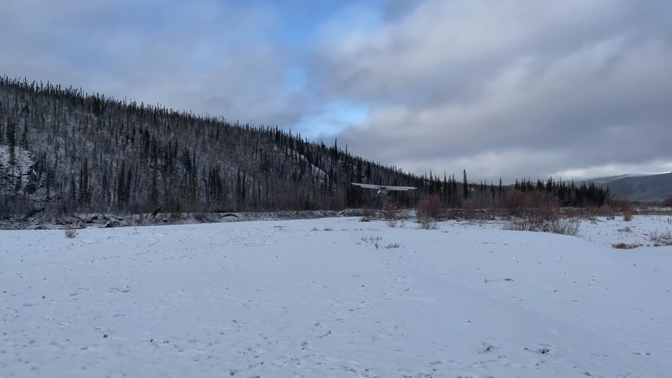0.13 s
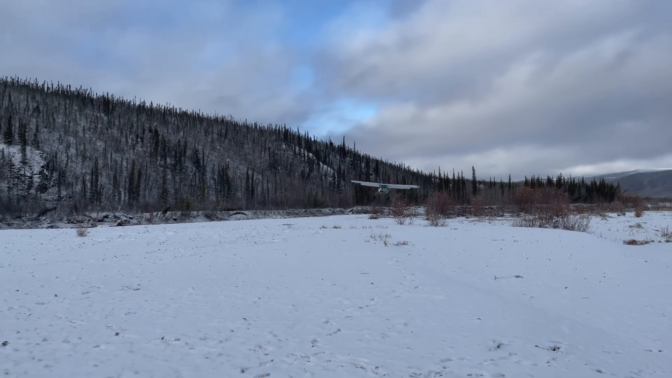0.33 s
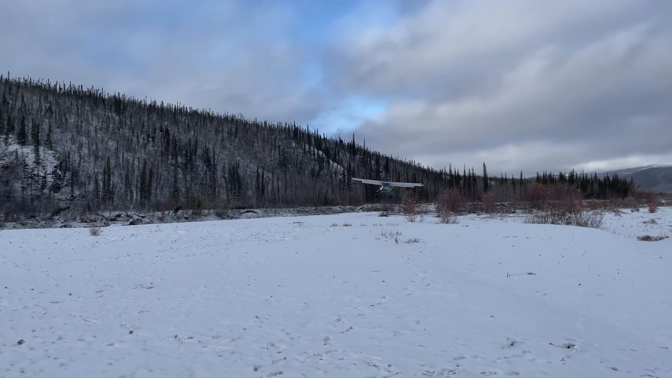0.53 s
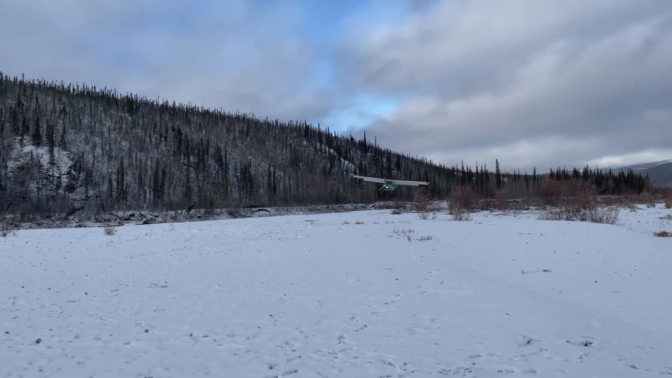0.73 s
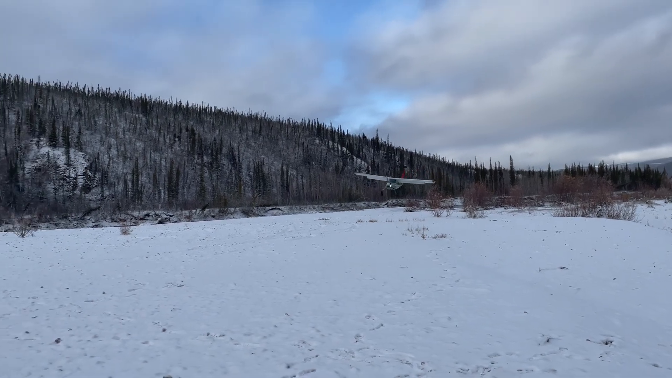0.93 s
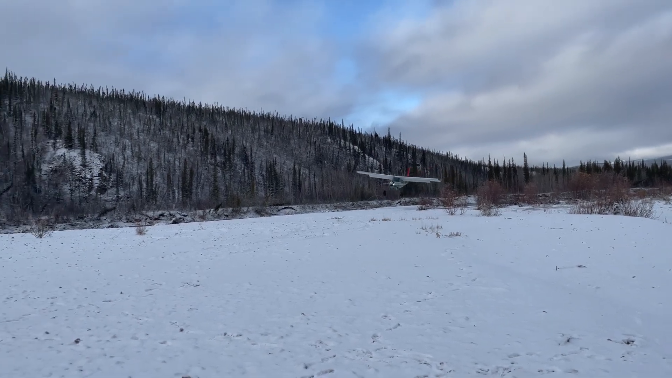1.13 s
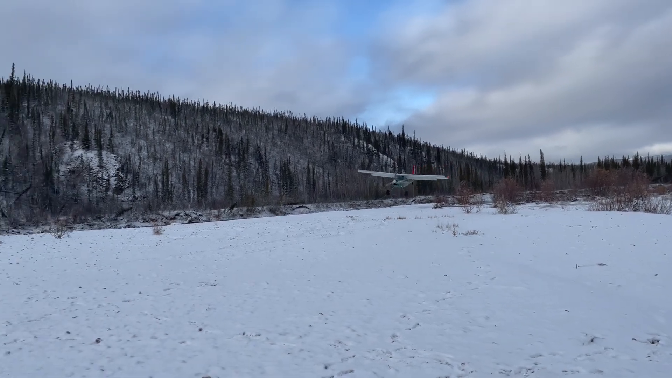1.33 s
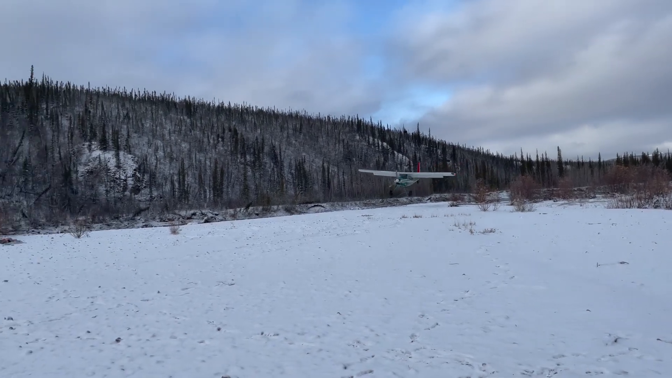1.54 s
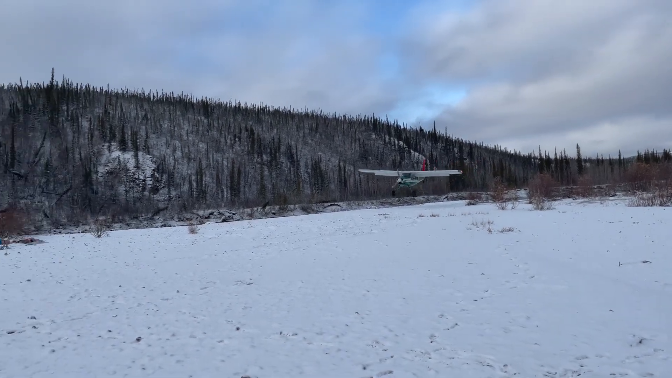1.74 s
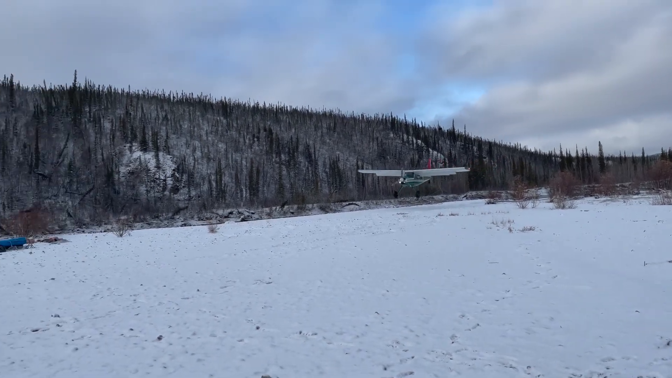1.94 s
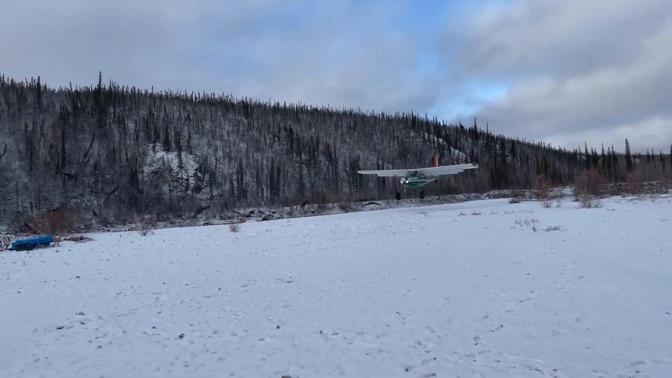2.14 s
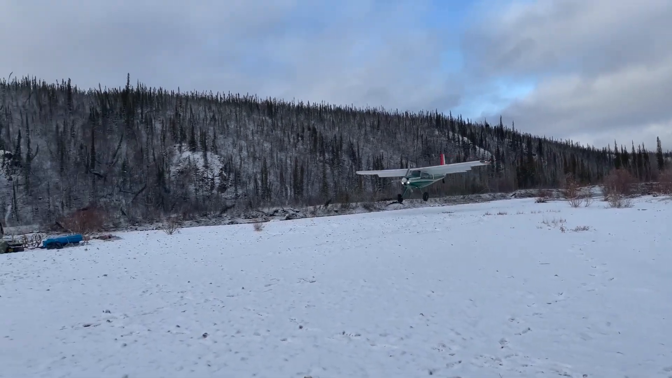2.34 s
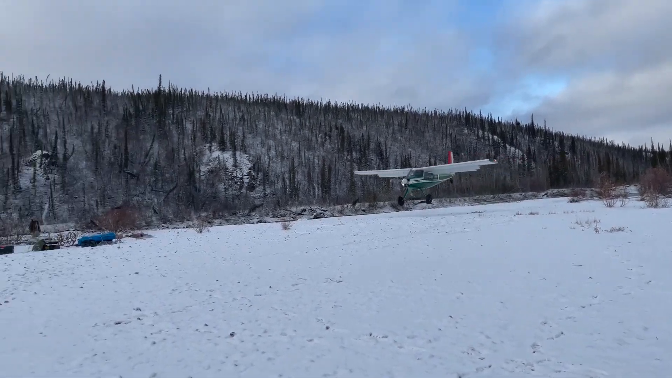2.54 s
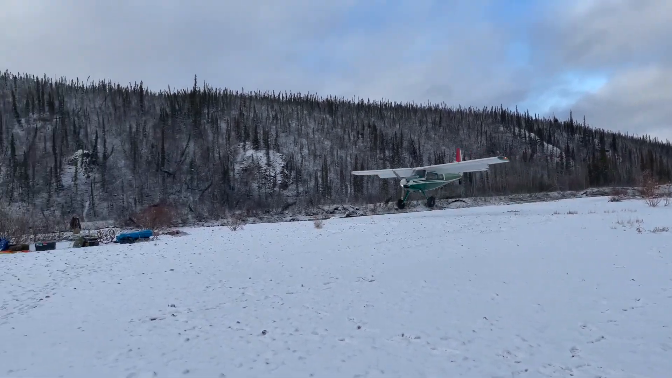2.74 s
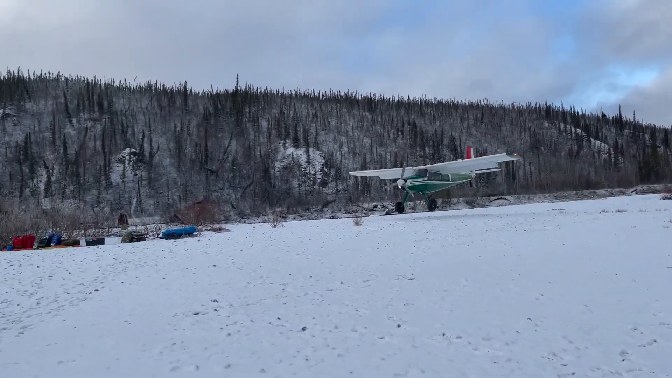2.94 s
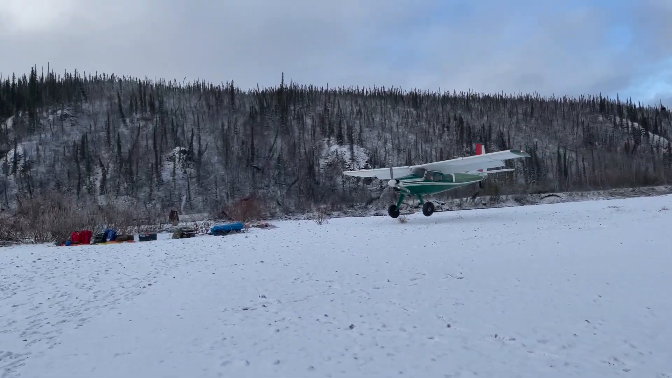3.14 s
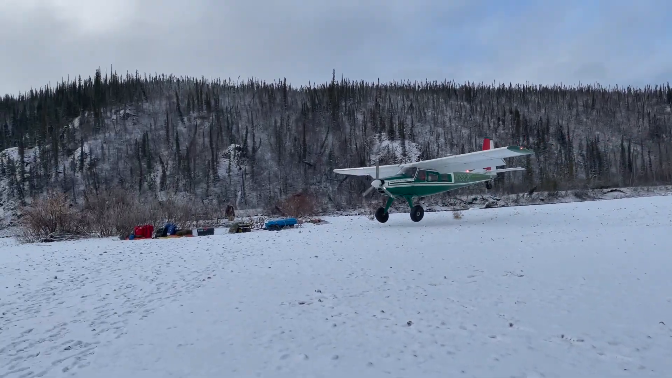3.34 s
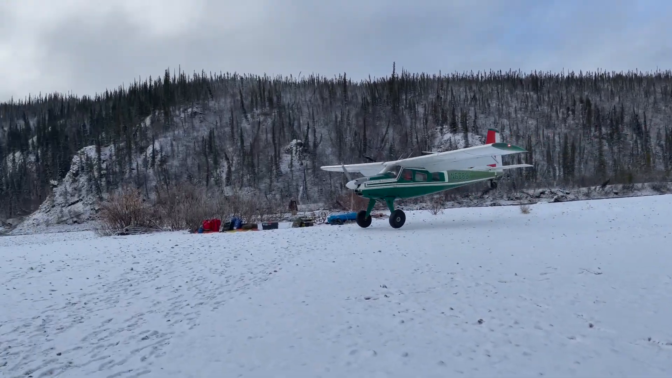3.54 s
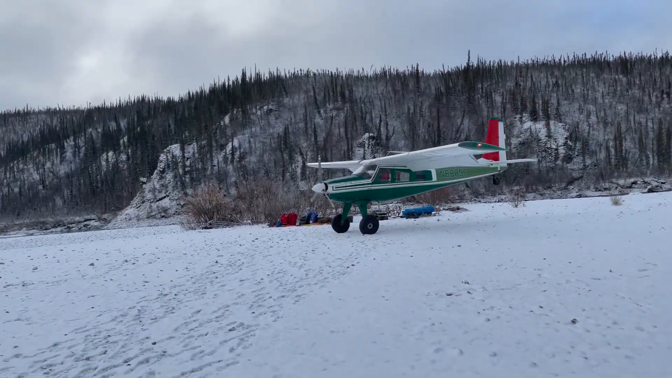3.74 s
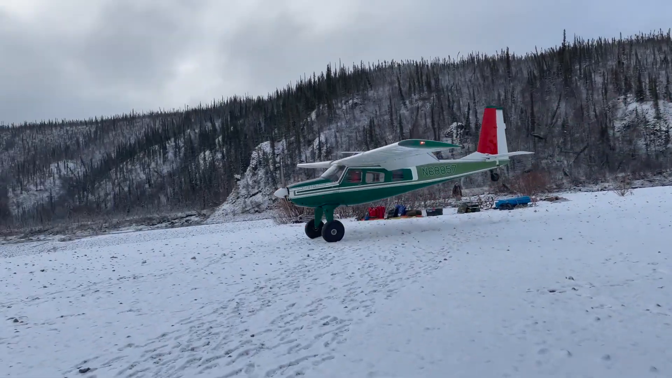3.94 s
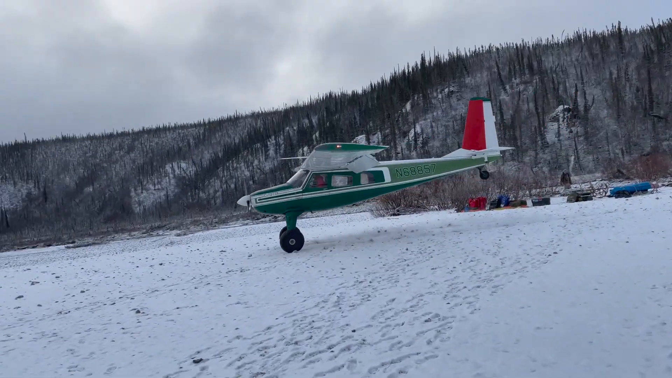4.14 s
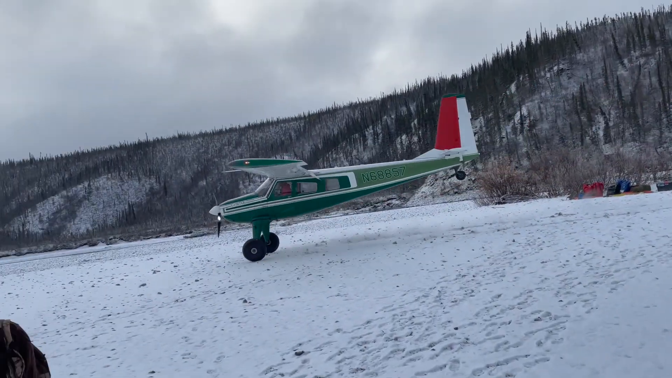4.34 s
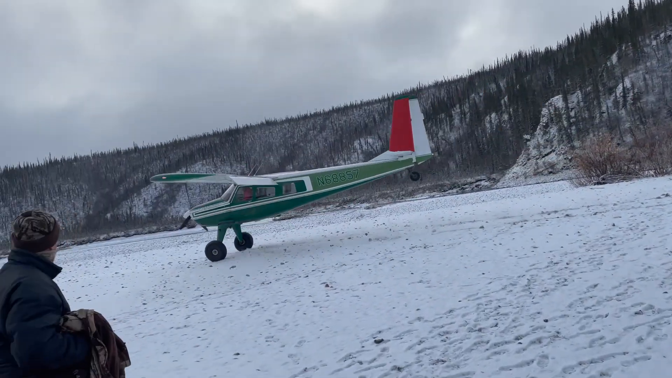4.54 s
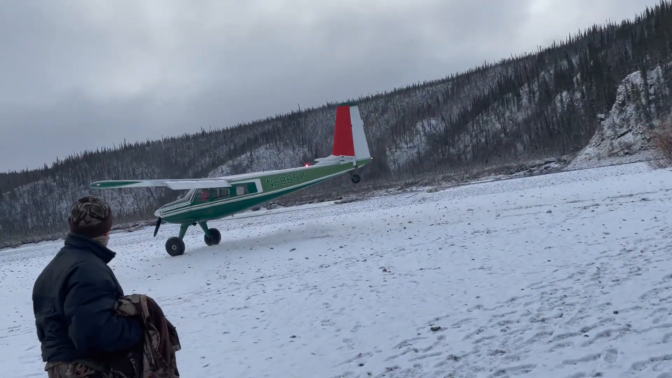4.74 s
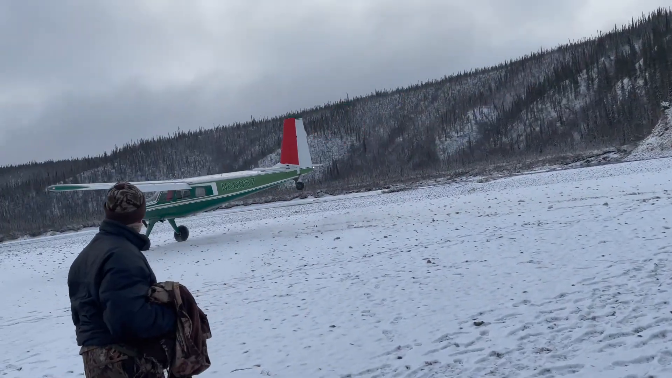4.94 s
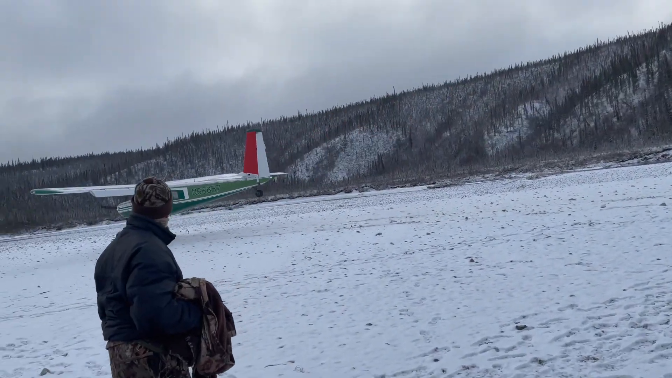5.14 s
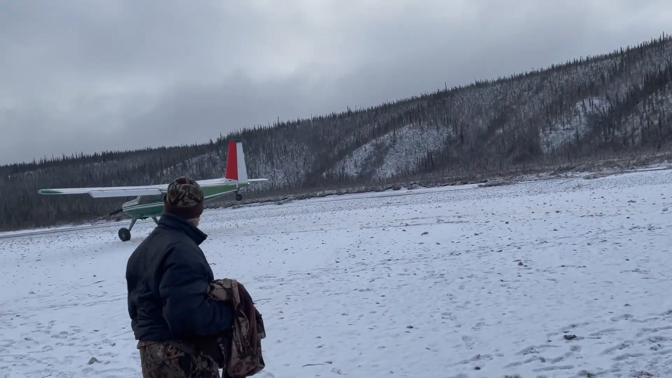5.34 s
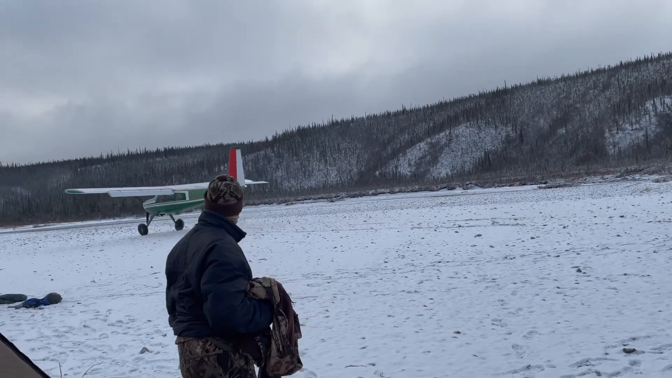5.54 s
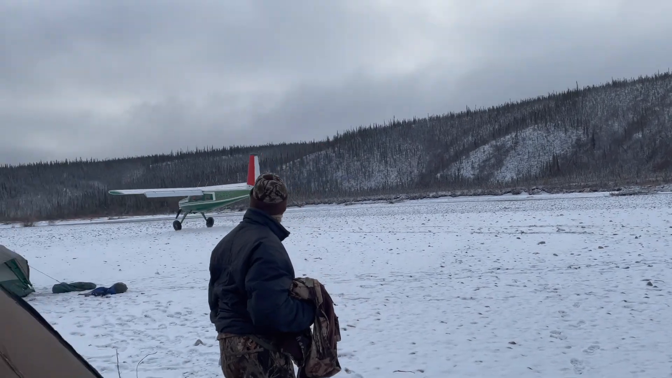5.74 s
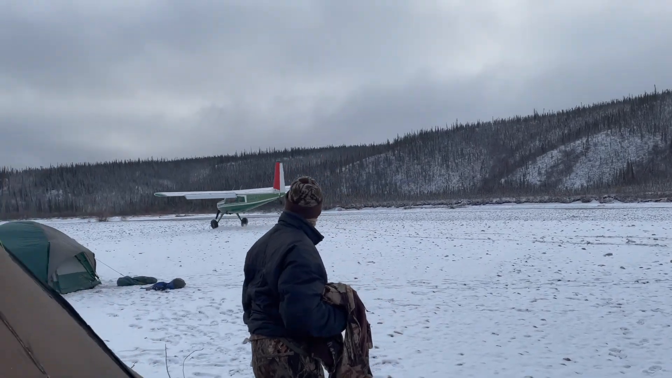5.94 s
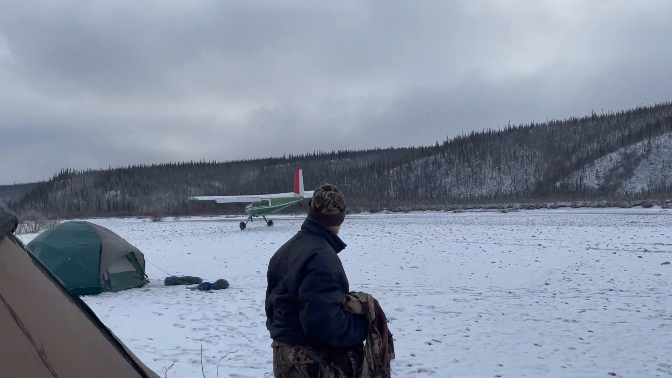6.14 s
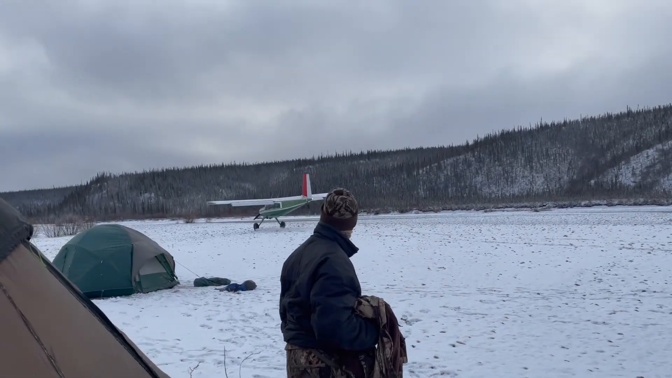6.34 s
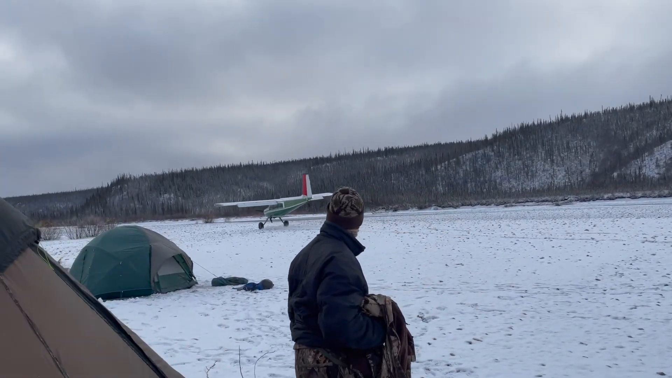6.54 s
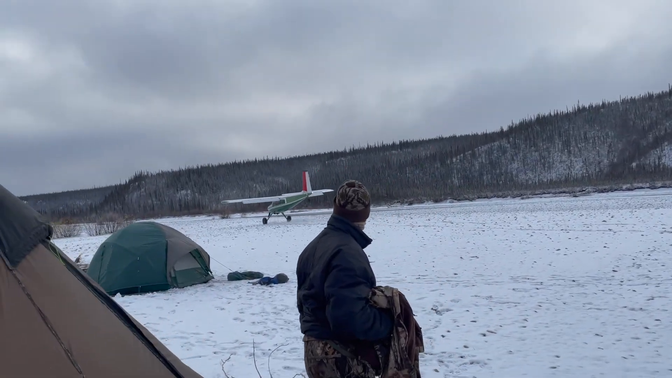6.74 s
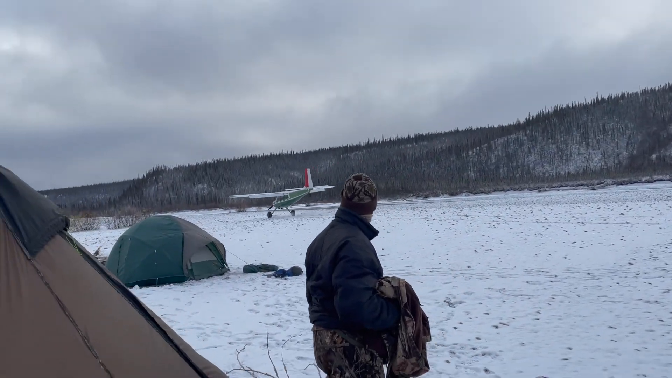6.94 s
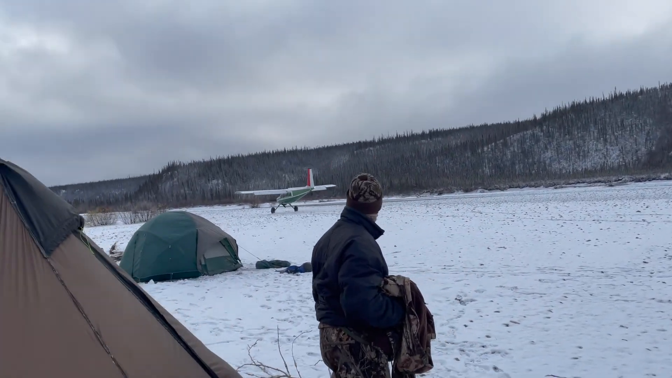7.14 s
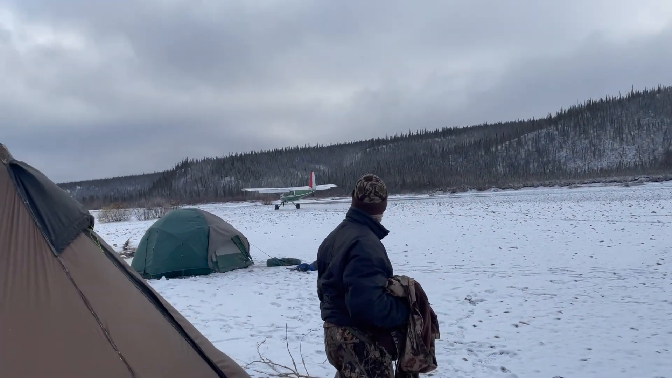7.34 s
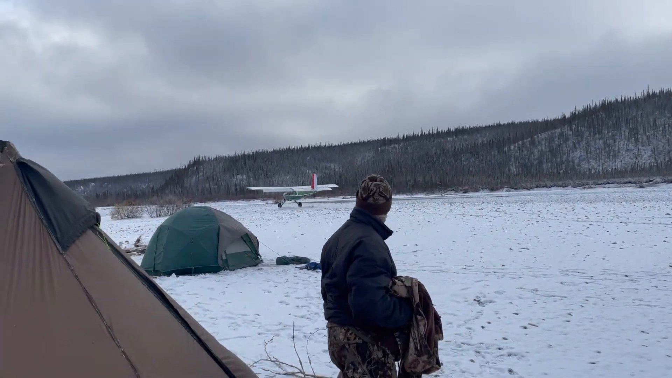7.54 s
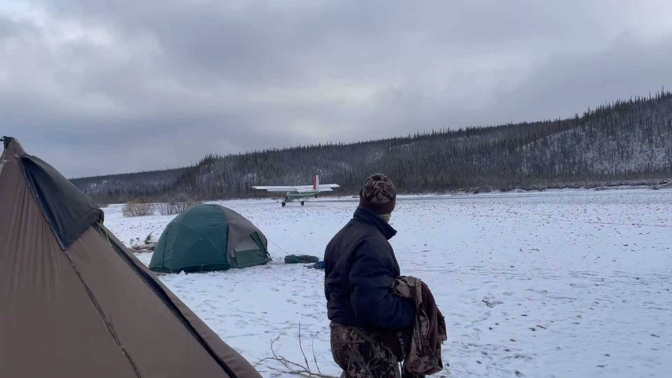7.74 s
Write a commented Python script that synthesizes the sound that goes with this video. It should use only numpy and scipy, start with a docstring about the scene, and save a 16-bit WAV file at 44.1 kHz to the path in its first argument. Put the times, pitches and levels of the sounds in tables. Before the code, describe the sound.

A piston engine and propeller swell from a thin, distant buzz to a full, throbbing roar, heard on a hand-held microphone in the open. As the plane lands past the listener the drone drops steeply, hiss and low boom surge, then everything falls away. Slow chuffing and faint propeller swishes remain. Near the end, dull handling bumps, dry cracks and light wind sit over the quiet engine.

```python
"""Light plane passing low

A geared six-cylinder engine with a three-blade propeller comes in, throttles back as it passes and recedes.
One falling firing rate drives sine orders, exhaust pulses, and the throb, chuffs and swishes of the air noise.
Wind noise, short cracks and dull bumps lie on top; a hand-held microphone hears it through two ports."""
import sys
import numpy as np
from scipy import signal
from scipy.fft import rfft, irfft, next_fast_len
from scipy.io import wavfile

SR = 44100
rng = np.random.default_rng(int(sys.argv[2]) if len(sys.argv) > 2 else 0)


def dump(signal):
    """Clip the signal to [-1, 1] and save it as 16-bit WAV at the path in sys.argv[1]."""
    limited = np.clip(np.atleast_2d(signal).T, -1, 1)
    pcm = np.round(limited * 32767).astype(np.int16)
    wavfile.write(sys.argv[1], SR, pcm)


N = 347489
HZ = np.fft.rfftfreq(next_fast_len(N), 1 / SR)
BLADES_PER_FIRING = 77 / 120
DRIFT_STEP_SAMPLES = 32


def amp(db):
    """Decibels to gain."""
    return 10 ** (np.asarray(db) / 20)


def left_right(db):
    """Gains of two ports, left over right by the given decibels."""
    return amp(np.array([[.5], [-.5]]) * db)


def in_time(rows):
    """Columns of a curve table at every sample."""
    s, *columns = np.transpose(rows)
    return [np.interp(np.arange(N) / SR, s, c) for c in columns]


def shaped(x, response):
    """Filter by a frequency response given on HZ."""
    size = next_fast_len(N)
    return irfft(rfft(x, size) * response, size)[..., :N]


def rms_one(x):
    """Scale to unit rms."""
    return x / np.sqrt(np.mean(x ** 2))


def drift(rate_hz, order=2, slowest_hz=0):
    """Random wander of spread 1, between a slowest speed and a rate."""
    size = next_fast_len(N // DRIFT_STEP_SAMPLES + 2)
    hz = np.fft.rfftfreq(size, DRIFT_STEP_SAMPLES / SR)
    highpass = hz / (hz + slowest_hz + 1e-9)
    lowpass = 1 / (1 + (hz / rate_hz) ** order)
    slow = irfft(rfft(rng.standard_normal(size)) * highpass * lowpass, size)
    return np.interp(np.arange(N) / DRIFT_STEP_SAMPLES, np.arange(size), rms_one(slow))


def noise_pair(response):
    """Two unrelated draws of filtered noise."""
    return rms_one(shaped(rng.standard_normal((2, N)), response))


# noise colour, lower and upper part: pitch_hz, density_db_per_hz
COLOUR = [(25, -31), (45, 7.5), (70, 22), (130, 20), (250, 16), (400, 6), (650, 2.5), (950, 1.5), (1200, 3),
          (1800, 2), (2800, 0), (3500, -3.5), (4600, -11.5), (7400, -21.5), (9500, -22.5)]
COLOUR_TOP = [(9500, -19), (11500, -24.5), (12800, -21), (13900, -30), (14500, -50), (15800, -62)]


def air(low_hz, high_hz):
    """Coloured noise between two crossovers."""
    hz, db = np.transpose(COLOUR + COLOUR_TOP[1:])
    band = 1 / np.sqrt((1 + (low_hz / (HZ + 1)) ** 8) * (1 + (HZ / high_hz) ** 8))
    colour_db = np.interp(np.log(HZ + 1), np.log(hz), db)
    return noise_pair(band * amp(colour_db))


def narrow(hz, half_width_hz):
    """Noise in one steep-sided band."""
    return noise_pair(1 / (1 + ((HZ - hz) / half_width_hz) ** 4))


def bursts(events, rise_s, fall_s):
    """Gain envelope with a soft-fronted, decaying hump at every event (s, dB)."""
    clicks, t = np.zeros(N), np.arange(SR // 2) / SR
    clicks[[round(s * SR) for s, db in events]] = amp([db for s, db in events])
    hump = (1 - np.exp(-t / rise_s)) * np.exp(-t / fall_s)
    return signal.fftconvolve(clicks, hump / hump.max())[:N]


# low engine and propeller tones: time_s, firing_tone_db, octave_db, blade_tone_db
TONES = [(0, -37.5, -72, -53), (.7, -28.5, -44, -51), (1.1, -21.5, -57, -48), (1.5, -17.5, -53, -51),
         (2, -17.5, -49, -45), (2.15, -19, -36.5, -49), (2.5, -16, -33, -33), (2.85, -12.5, -28.5, -36),
         (3.15, -13.5, -28.5, -32), (3.45, -15, -32, -25), (3.65, -11.5, -22, -22),
         (4, -11.5, -23.5, -20.5), (4.5, -13.5, -34, -24), (5.25, -16.5, -42, -26), (5.4, -17, -54, -35),
         (5.65, -27.5, -57, -49), (6.2, -24.5, -53, -60), (6.55, -29, -42, -44), (6.9, -53, -64, -66),
         (7.88, -56, -50, -67)]
# beat strengths: time_s, exhaust_pulse_db, firing_throb_0_1, blade_throb_0_1, first_hollows_0_1, half_rate_tone_db
BEAT = [(0, -75, 0.6, 0.2, 0.96, -62), (.8, -63, 0.24, 0, 0.96, -57), (1.6, -37, 0.4, 0, 0.86, -56),
        (2.2, -48, 0, 0, 0.71, -53), (2.6, -37.5, 0.3, 0.1, 0.2, -44), (3, -38, 0.2, 0, 0.47, -48),
        (3.35, -38, 0.2, 0.2, 0.63, -49), (3.55, -40, 0, 0.1, 0.47, -21), (3.9, -48, 0.05, 0.3, 0.75, -30),
        (4.3, -55, 0, 0.4, 0.67, -44), (5, -47, 0.24, 0.05, 0.43, -50), (6, -63, 0.26, 0.02, 0.3, -60),
        (7.88, -61, 0, 0, 0.81, -72)]
# side orders of the four-stroke cycle: order_per_cycle, level_db_re_firing_tone
UNEVEN = [(4, -49), (5, -23), (7, -24.5), (8, -27), (9, -29), (10, -36), (15, -33)]


def tones(firings, tone_db, octave_db, blade_db):
    """Low orders as sines; turbulence on the path makes them waver."""
    turn = 2 * np.pi * firings
    out = amp(tone_db + 0.39 * drift(19, order=4)) * np.cos(turn + 0.4 * drift(2.8, order=4))
    out += amp(octave_db) * np.cos(2 * turn - .6 + 0.22 * drift(24))
    out += amp(blade_db + 2.0 * drift(6.9)) * np.cos(BLADES_PER_FIRING * turn + .5 * drift(0.54))
    half_rate_db = in_time(BEAT)[4]
    out += amp(half_rate_db) * np.cos(turn / 2)
    for order, db in UNEVEN:
        level = amp(tone_db + db + 3.5 * drift(2.5))
        out += level * np.cos(2 * np.pi * (order * firings / 6 + rng.random()))
    return np.sqrt(2) * out


# relative exhaust pulse strength of each cylinder: level_db
CYLINDER_DB = [-11, 5, -5, -14, -0.5, -19]
# pipe resonances: pitch_hz, width_hz, level_db
PIPE = [(650, 270, -6), (770, 25, 18.5), (1090, 120, -15), (1237, 15, 20.5), (374, 51, -21),
        (2220, 100, -35), (3300, 100, -20)]


def exhaust(firings, pulse_db):
    """One pulse a firing, uneven between cylinders, ringing in the pipes."""
    at = np.flatnonzero(np.diff(np.floor(firings)))
    clicks = np.zeros(N)
    clicks[at] = amp(np.resize(CYLINDER_DB, len(at)) + 0.7 * rng.standard_normal(len(at)))
    pipes = sum(amp(db) / (1 + 1j * (HZ ** 2 - hz ** 2) / (HZ * width + 1)) for hz, width, db in PIPE)
    lowpass = 1 / (1 + (HZ / 4000) ** 4)
    return amp(pulse_db) * rms_one(shaped(clicks, pipes * lowpass))


# upper orders: order_per_cycle, then db_re_firing_tone (before strength_db) at power, easing off, throttled back
CHORD = [(11, -45, -40, -23), (13, -45, -26, -40), (14, -24, -29, -25), (17, -27, -38, -28),
         (18, -25, -28, -23), (19, -32, -31, -26), (20, -34, -23, -31), (21, -28, -34, -36),
         (22, -27, -23, -27), (23, -32, -30, -27), (24, -20, -29, -26), (25, -23, -36, -38),
         (26, -32, -24, -30), (27, -27, -33, -21), (28, -31, -26, -22), (29, -28, -28, -24),
         (30, -17, -36, -31), (31, -24, -36, -38), (32, -36, -28, -38), (33, -26, -30, -26),
         (34, -33, -29, -33), (35, -31, -38, -38), (36, -30, -27, -22), (37, -38, -25, -32),
         (39, -34, -35, -42), (42, -42, -29, -33), (44, -33, -38, -33), (45, -42, -42, -33),
         (47, -23, -28, -42), (48, -30, -32, -29), (50, -30, -36, -33), (51, -30, -40, -40),
         (52, -42, -29, -42), (53, -38, -38, -30), (54, -22, -32, -38), (55, -38, -32, -30)]
# throttle; the chord fades once the exhaust points away: time_s, throttled_back_0_1, chord_strength_db
THROTTLE = [(0, 0, 9), (.8, 0, 5), (1.4, 0, 1), (1.95, 0, 1), (2.15, .5, 1), (2.55, .5, 2), (2.8, 1, 2),
            (3.3, 1, 2), (3.6, 1, -9), (7.88, 1, -14)]
BARK_AT_S, BARK_SMEAR_TURNS = .298, .2


def chord(firings, tone_db):
    """Buzzy upper orders, roughly in step, so that they bark once a cycle."""
    back, strength_db = in_time(THROTTLE)
    cycle = (firings - firings[round(BARK_AT_S * SR)]) / 6 + .002 * drift(6)
    out = np.zeros(N)
    for order, *db in CHORD:
        order_db = np.interp(back, [0, .5, 1], db)
        level_db = tone_db + strength_db + order_db + 1.2 * drift(3)
        turns = order * cycle + BARK_SMEAR_TURNS * rng.standard_normal() + .025 * drift(3)
        out += amp(level_db) * np.cos(2 * np.pi * turns)
    return np.sqrt(2) * out


def throb(firings):
    """Gain at firing rate; one bank of three cylinders is louder, which adds a half-rate part."""
    depth = np.clip(in_time(BEAT)[1], 0, 1)
    return 1 + depth * (0.45 * np.cos(2 * np.pi * firings) + 0.38 * np.cos(np.pi * firings))


# lower air noise: time_s, boom_db, rumble_db, roar_db
RUSH = [(0, -47, -41, -29), (.4, -40, -29.5, -32.5), (1, -58, -23.5, -28.5), (1.7, -53, -19, -27),
        (2.06, -46, -21, -24.5), (2.22, -48, -21, -26.5), (2.7, -43, -24, -25.5), (3.18, -25, -18, -21.5),
        (3.44, -28, -19, -23.5), (3.8, -26, -20.5, -21.5), (4.1, -20.5, -15, -22), (4.5, -16.5, -15.5, -22),
        (4.9, -19.5, -23, -28.5), (5.3, -19.5, -28.5, -32.5), (5.7, -29, -32.5, -37.5),
        (6.4, -24, -33, -37.5), (6.64, -42, -41, -41.5), (6.73, -38, -45, -36), (6.87, -43, -45, -42),
        (7.1, -48, -35.5, -40.5), (7.46, -39.5, -63, -46), (7.6, -41, -40, -38.5), (7.69, -46, -37, -43),
        (7.8, -40, -40, -41), (7.88, -34, -45, -42)]
# low-middle noise: time_s, level_db (before a 2 dB cut)
GROWL = [(0, -48), (.4, -35), (.6, -25), (.9, -42), (1.2, -19.5), (1.5, -38), (2.08, -36), (2.7, -39),
         (3.27, -33), (3.49, -36), (3.6, -40), (3.8, -26), (4.19, -17), (4.67, -37), (4.76, -26),
         (4.89, -36), (5.05, -21.5), (5.4, -35), (5.7, -39.5), (6.0, -39), (6.32, -40), (6.5, -51),
         (6.71, -30), (6.82, -47), (7.05, -39), (7.3, -58), (7.88, -58)]
# brief surges of the low noise: time_s, boom_db, rumble_db
SURGES = [(.86, -26, -50), (1.65, -35, -25), (1.9, -32, -50), (3.46, -17, -32), (3.92, -24, -23),
          (4.15, -35, -24), (4.36, -37, -35), (4.52, -40, -36), (4.81, -13.5, -43), (5.019, -17, -20),
          (5.15, -24, -23.5), (5.27, -22, -44), (5.41, -22, -33), (6.49, -24, -44), (6.54, -49, -27.5),
          (6.68, -39, -25), (7.64, -33, -56)]
SURGE_RISE_S, SURGE_FALL_S = 0.062, 0.028


def low_rush(firings):
    """Boom, rumble, growl and throbbing roar: fluctuating bands of air noise."""
    boom_db, rumble_db, roar_db = in_time(RUSH)
    growl_db = in_time(GROWL)[0] - 2.0
    boom_surge, rumble_surge = (bursts(np.array(SURGES)[:, [0, k]], SURGE_RISE_S, SURGE_FALL_S) for k in (1, 2))
    out = (amp(boom_db + 1.2 * drift(6)) + boom_surge) * air(47, 95)
    out += (amp(rumble_db + 2.0 * drift(17)) + rumble_surge) * air(129.5, 242)
    out += amp(growl_db + 2.1 * drift(29)) * air(217, 400)
    return out + amp(roar_db + .6 * drift(14, slowest_hz=5)) * throb(firings) * air(402, 1300)


# direction of the plane: time_s, abreast_0_1, going_away_0_1
ASPECT = [(0, 0.04, 0.2), (2, 0.13, 0), (2.6, 0.24, 0), (3.5, 0.53, 0), (4.2, 0.9, 0.54), (4.7, 0.54, 0.05),
          (5, 0.4, 1), (6, 0.6, 0.74), (7, 0, 1), (7.88, 0, 1)]
FLUTTER_LEAST_DB, FLUTTER_MOST_DB = .8, 2.3


def patchy(low_hz, high_hz, count):
    """Air noise in neighbouring bands that flutter separately, more once the plane is abreast or going away."""
    depth_db = np.interp(sum(in_time(ASPECT)), [.5, 1], [FLUTTER_LEAST_DB, FLUTTER_MOST_DB])
    place = np.clip(np.log(HZ / low_hz + 1e-9) / np.log(high_hz / low_hz), 0, 1) * (count - 1)
    noise = air(low_hz, high_hz)
    out = 0
    for k in range(count):
        flutter = amp(depth_db * drift(14, slowest_hz=5))
        out = out + flutter * shaped(noise, np.maximum(1 - np.abs(place - k), 0))
    return out


# upper air noise: time_s, rasp_db, sizzle_db, tip_hiss_db
SPRAY = [(0, -40.5, -48.5, -80), (.35, -38.5, -50.5, -70), (.8, -32.5, -45, -60.5),
         (1.4, -27.5, -36.5, -51.5), (1.85, -31, -39, -49.5), (2.6, -35.5, -39, -46.5),
         (2.92, -30.5, -33, -39.5), (3.3, -32, -35.5, -41.5), (3.55, -32, -33.5, -40),
         (3.7, -31, -28.5, -32.5), (3.85, -34, -33, -38), (4.06, -36, -34.5, -37.5),
         (4.35, -34.5, -33, -35), (4.45, -39, -36, -39.5), (4.55, -37.5, -33, -34.5),
         (4.67, -40, -33.5, -41.5), (4.85, -54, -37.5, -41.5), (5.1, -35, -45.5, -45),
         (5.42, -45, -45.5, -51.5), (6, -42, -46.5, -54), (6.3, -49, -52, -55), (6.56, -49.5, -52.5, -59.5),
         (6.89, -47, -55, -56.5), (7.1, -48.5, -56.5, -61.5), (7.3, -49, -56, -61), (7.4, -51, -63, -65),
         (7.6, -56, -59.5, -67), (7.88, -57, -57.5, -68)]
# topmost hiss, strongest around the pass and faint before and after: time_s, level_db
TOPMOST = [(0, -100), (1.3, -88), (2.1, -70), (2.5, -62), (2.92, -54), (3.7, -51), (4.5, -50), (5, -62),
           (5.5, -68), (5.9, -76), (6.3, -87), (7.88, -105)]


def high_rush(firings):
    """Rasp, sizzle and tip hiss throb with the firings, the hiss with the blades too; topmost hiss does not."""
    rasp_db, sizzle_db, hiss_db = in_time(SPRAY)
    fire = throb(firings)
    blade_depth = np.clip(in_time(BEAT)[2], 0, 1)
    blade = 1 + blade_depth * np.cos(2 * np.pi * BLADES_PER_FIRING * firings)
    out = amp(rasp_db) * fire * patchy(940, 2950, count=3)
    out += amp(sizzle_db) * fire * patchy(3220, 9700, count=3)
    out += amp(hiss_db + 1.2 * drift(14)) * fire * blade * air(8500, 14200)
    return out + amp(in_time(TOPMOST)[0] + 1.5 * drift(10)) * narrow(14600, 650)


# exhaust whistle: time_s, level_db, chop_twice_a_cycle_0_1
WHISTLE = [(0, -52, 0), (.4, -43, 0), (1.6, -49, 0), (2.2, -70, 0), (3.5, -40, 0.5), (4.2, -53, 0),
           (4.6, -44, 0.4), (4.8, -38, 0.7), (5.3, -41.5, 0), (5.8, -56, 0), (6.4, -68, 0.3),
           (7.88, -60, 0.5)]
WHISTLE_HZ, WHISTLE_HALF_WIDTH_HZ = 3370, 440


def whistle(firings, chuffs):
    """Gas noise in one narrow resonance: steady, chopped at times, and struck by every chuff."""
    level_db, chop = in_time(WHISTLE)
    gain = amp(level_db) * (1 + np.clip(chop, 0, 1) * np.cos(2 * np.pi * firings / 3))
    gain += bursts(chuffs, rise_s=0.003, fall_s=0.0086)
    return gain * noise_pair(1 / (1 + ((HZ - WHISTLE_HZ) / WHISTLE_HALF_WIDTH_HZ) ** 2))


# chuffs and swishes on the overrun: time_s, chuff_db, swish_db, swish_spread_db
OVERRUN = [(3.3, -70, -56, 3), (3.7, -65, -44, 3), (4, -60, -47, 3), (4.3, -55, -42, 3),
           (4.55, -46, -44, 3), (4.8, -40, -55, 3), (5.2, -38, -54, 2), (5.75, -39, -52, 2),
           (6, -45, -53, 2), (6.3, -46, -56, 2), (6.5, -58, -59, 2), (6.85, -56, -66, 2),
           (7.05, -56, -60, 2), (7.25, -58, -56, 2), (7.4, -60, -65, 2), (7.88, -64, -67, 2)]


def once_a_turn(turns, at_s, level_db, spread_db, jitter_s):
    """Events (s, dB), one a turn, in step with a known one and uneven in time and strength."""
    at = np.flatnonzero(np.diff(np.floor(turns - turns[round(at_s * SR)])))
    at = at[at > OVERRUN[0][0] * SR]
    s = np.minimum(at / SR + jitter_s * rng.standard_normal(len(at)), (N - 1) / SR)
    event_db = level_db + spread_db * rng.standard_normal(N)
    return list(zip(s, event_db[at]))


CHUFF_AT_S, CHUFF_SPREAD_DB, CHUFF_JITTER_S = 5.567, 2.2, .003


def whistle_and_chuffs(firings):
    """The loudest cylinder chuffs once a cycle, striking the whistle and adding a bright burst."""
    chuffs = once_a_turn(firings / 6, CHUFF_AT_S, in_time(OVERRUN)[0], CHUFF_SPREAD_DB, CHUFF_JITTER_S)
    bright = amp(-7) * bursts(chuffs, rise_s=.001, fall_s=.003) * air(2000, 6500)
    return whistle(firings, chuffs) + bright


SWISH_AT_S, SWISH_JITTER_S = 6.476, .005


def swishes(firings):
    """The propeller swishes once a turn, downward: the top speaks first, the lower part swells after it."""
    _, level_db, spread_db = in_time(OVERRUN)
    events = once_a_turn(BLADES_PER_FIRING * firings / 3, SWISH_AT_S, level_db, spread_db, SWISH_JITTER_S)
    top = bursts(events, rise_s=.008, fall_s=.007) * narrow(12800, 800)
    return top + amp(-5) * bursts(events, rise_s=.03, fall_s=.011) * narrow(11200, 700)


# narrow resonances: pitch_hz, half_width_hz, level_db_re_rasp (at full power)
WHINES = [(1960, 65, -14), (2530, 95, -16.5), (3420, 37, -12.5), (5050, 44, -30), (6020, 65, -34.5)]


def whines():
    """Noise in narrow resonances, fading out as the throttle closes."""
    peaks = sum(amp(db) / np.sqrt(width / 60) / (1 + ((HZ - hz) / width) ** 2) for hz, width, db in WHINES)
    total = np.linalg.norm(amp(np.array(WHINES)[:, 2]))
    rasp_db, back = in_time(SPRAY)[0], in_time(THROTTLE)[0]
    return amp(rasp_db) * (1 - back) * total * noise_pair(peaks)


# wind at the ports: time_s, level_db, left_right_db
WIND = [(0, -34, 3), (.6, -37.5, -1), (1, -40.5, -13), (2.4, -36, -2), (4, -48, 13), (5.3, -23.5, 4.5),
        (6, -57, 4), (6.7, -32, 3), (6.9, -49, -4), (7.05, -41, -6), (7.3, -42, 1), (7.55, -40.5, 1),
        (7.7, -44.5, -7), (7.88, -43.5, 3)]


def wind():
    """Lumpy low noise, its own at each port."""
    level_db, pan_db = in_time(WIND)
    lumps_db = 5.7 * np.array([drift(7.9), drift(4.7)])
    gain = amp(level_db + lumps_db) * left_right(pan_db)
    return gain * noise_pair((HZ / 60) / (1 + (HZ / 140) ** 3.2))


# sharp cracks close by: time_s, dull_peak_db, bright_peak_db
CRACKS = [(.211, -37, -40), (5.155, -23, -26), (5.168, -22, -28), (5.83, -44, -41), (6.01, -38, -31),
          (6.105, -26, -30), (6.675, -40, -35), (6.736, -34, -38), (6.746, -26, -37), (6.755, -24, -31),
          (6.761, -30, -41), (6.781, -32, -34), (6.915, -34, -42), (6.97, -31, -37), (7.068, -34, -44),
          (7.405, -42, -48), (7.65, -43, -50), (7.79, -39, -38)]
CREST_DB = 7.5  # peak of a noise burst over its rms


def cracks():
    """Short noise bursts near the microphone, each with a dull and a bright part."""
    dull, bright = (bursts(np.array(CRACKS)[:, [0, k]], rise_s=.0003, fall_s=.003) for k in (1, 2))
    return amp(-CREST_DB) * (dull * air(820, 2800) + bright * air(2800, 7500))


# dull bumps and scuffs: start_s, peak_db, start_pitch_hz, left_right_db, ring_cycles, half_pitch_rise_per_cycle_0_1
BUMPS = [(1.65, -21, 402, 12, 0.6, 0.02), (2.404, -24, 343, 18, 0.51, 0.04), (5.074, -27, 200, 1, 0.4, 0),
         (5.129, -6, 170, -3, 0.6, 0.01), (4.76, -17, 280, 7, 0.57, 0), (5.03, -20, 330, 10, .6, 0.1),
         (5.204, -23, 231, 6, 0.7, 0), (5.26, -26, 280, 2, 0.66, 0), (5.33, -25, 220, 0, .6, 0.02),
         (6.559, -21, 200, 12, 0.51, 0), (6.563, -32, 400, 11, 0.8, 0.08), (6.601, -29, 149, 6, 1, 0),
         (6.681, -24.5, 146, 10, 0.67, 0.24), (6.697, -25, 343, 9, 1.3, 0.01),
         (6.716, -26.5, 328, 3, 1.6, 0.02), (6.738, -29, 480, 6, 0.66, 0), (6.742, -28, 106, 2, 0.68, 0.14),
         (6.783, -27, 228, 0, 0.81, 0), (7.02, -31.5, 200, 0, 0.99, 0.06), (7.065, -31, 240, 0, .9, 0.01),
         (7.205, -39, 400, 0, .5, 0.05), (7.403, -35.5, 603, -6, 0.7, 0.14),
         (7.505, -36, 246, -2, 0.81, 0.02), (7.575, -43.5, 805, 6, 5.6, 0), (7.603, -44, 440, 2, 3.7, 0),
         (7.635, -36, 149, 2, .9, 0), (7.657, -36, 140, 2, .9, 0), (7.73, -35, 159, -2, 0.78, 0.05),
         (7.845, -30, 131, -2, 0.51, 0)]


def bumps():
    """Each bump is a few damped cycles; a scuff rings longer or slides in pitch."""
    out, t = np.zeros((2, N + SR)), np.arange(SR // 8) / SR
    for s, db, hz, pan_db, ring, rise in BUMPS:
        cycles = np.sin(2 * np.pi * hz * t * (1 + rise * hz * t)) * t * np.exp(-hz * t / ring)
        start = round(s * SR)
        out[:, start:start + len(t)] += amp(db) * left_right(pan_db) * cycles / np.abs(cycles).max()
    return out[:, :N]


def hollowed(x, hollows, share):
    """Narrow bands cut out of the given share of the sound."""
    dips = [1 - np.clip(depth, 0, 1) / (1 + ((HZ - hz) / width) ** 2) for hz, width, depth in hollows]
    share = np.clip(share, 0, 1)
    return share * shaped(x, np.prod(dips, axis=0)) + (1 - share) * x


# hollows strongest early, returning at the end: pitch_hz, half_width_hz, depth_0_1
FIRST_HOLLOWS = [(232.4, 99, 1), (937, 260, 0.62), (1387, 79, 0.81), (1787, 24, 1), (2156, 22, 0.75),
                 (2536, 25, 0.7), (3840, 29, 0.74), (7120, 280, 0.69)]
# hollows with the plane abreast, then going away: pitch_hz, half_width_hz, depth_0_1
HOLLOWS_ABREAST = [(1320, 92, 0.86), (2260, 81, 0.43), (2740, 82, 0.66), (4130, 81, 0.53)]
HOLLOWS_AWAY = [(1175, 102, 0.6), (1570, 57, 0.48), (2350, 350, 0.41), (4320, 140, 0.17), (5440, 230, 0.21)]


def reflections(x):
    """Reflections near the microphone hollow out narrow bands, in shares that shift during the pass."""
    abreast, away = in_time(ASPECT)
    x = hollowed(x, FIRST_HOLLOWS, in_time(BEAT)[3])
    x = hollowed(x, HOLLOWS_ABREAST, abreast)
    return hollowed(x, HOLLOWS_AWAY, away)


# lead of the low tones at the left port: time_s, left_early_ms, waver_ms
BEARING = [(0, -.15, .3), (1.5, -.2, .4), (2.9, 0, .25), (4, .07, .15), (5, .32, .25), (6, 0, .2),
           (7.88, 0, .2)]


def from_bearing(pair):
    """One port hears the low tones a little before the other."""
    early_ms, waver_ms = in_time(BEARING)
    shift = (early_ms + waver_ms * drift(4)) * SR / 2000  # samples, half the lead at each port
    at = np.arange(N)
    return np.array([np.interp(at + shift, at, pair[0]), np.interp(at - shift, at, pair[1])])


# microphone ports: pitch_hz, left_right_db, left_lead_rad, likeness_0_1
PORTS = [(0, 1, 0, .7), (70, 1, .1, .8), (140, 1.2, .13, .75), (350, 2, .3, .5), (700, 2, .75, .88),
         (1250, 4, 1.3, .92), (1700, 4, 2, .4), (2300, -1, 7.3, .8), (3200, -1, 9.4, .75),
         (4000, 6, 8.8, .4), (5200, 11, 12.3, .55), (7000, 12, 11.5, .35), (8300, 1, 9.8, .75),
         (9200, 0, 9.42, 1), (9800, 0, 8.8, .8), (11700, 0, 7.4, .7), (12900, 0, 6.28, 1),
         (16000, 0, 6.28, 1)]


def ports(direct, scattered):
    """The hand-held body shades and delays sound differently at each port; scattered sound is unalike."""
    pitch_hz = np.array(PORTS)[:, 0]
    _, pan_db, lead, alike = (np.interp(HZ, pitch_hz, c) for c in np.transpose(PORTS))
    alike = np.clip(alike, 0, 1)
    notch = 1 - 0.63 / (1 + ((HZ - 5600) / 230) ** 2)  # cavity behind the ports
    left = notch * amp(pan_db / 2) * np.exp(.5j * lead)
    right = notch * amp(-pan_db / 2) * np.exp(-.5j * lead)
    same, other = np.sqrt((1 + alike) / 2), np.sqrt((1 - alike) / 2)
    return np.array([shaped(direct, left * same) + shaped(scattered, left * other),
                     shaped(direct, right * same) - shaped(scattered, right * other)])


# engine speed as heard, falling with throttle and the pass: time_s, firing_hz
SPEED = [(0, 140), (.6, 141.6), (1, 143.5), (1.75, 143.2), (2.1, 139.7), (2.5, 134.4), (3, 127.3),
         (3.375, 121.8), (3.75, 109), (4.125, 95.6), (4.5, 86.4), (4.875, 79.05), (5.25, 74.14),
         (5.625, 69.3), (6.125, 65), (6.5, 63.4), (7, 61.2), (7.88, 59.8)]


def scene():
    """Plane and cracks through the ports, plus low tones, bumps and wind."""
    firings = np.cumsum(in_time(SPEED)[0]) / SR
    levels_db = in_time(TONES)
    rush = low_rush(firings) + high_rush(firings) + whistle_and_chuffs(firings) + swishes(firings)
    direct, scattered = reflections(rush) + whines() + cracks()
    buzz = chord(firings, levels_db[0]) + exhaust(firings, in_time(BEAT)[0])
    low = from_bearing(left_right(1) * tones(firings, *levels_db))
    return low + ports(buzz + direct, scattered) + bumps() + wind()


STOPBAND_HZ, STOPBAND_CUT_DB = 15950, 70


def record(dry):
    """Peaks are rounded, the top is cut."""
    rounded = 0.86 * np.tanh(dry / 0.97)
    top_cut = signal.cheby2(20, STOPBAND_CUT_DB, STOPBAND_HZ, fs=SR, output="sos")
    return signal.sosfilt(top_cut, rounded)


dry = scene()
out = record(dry)
dump(out)
```